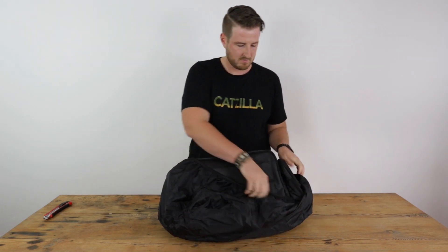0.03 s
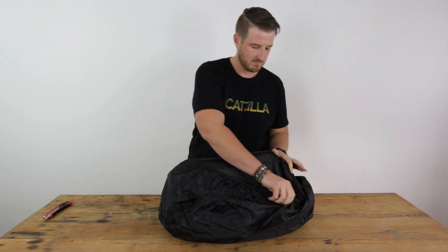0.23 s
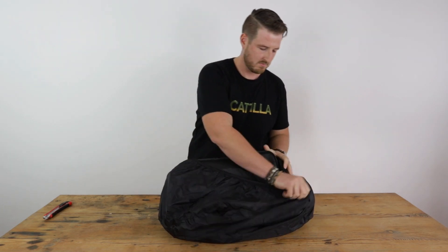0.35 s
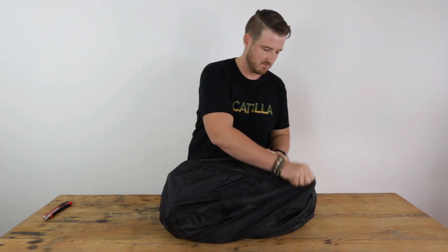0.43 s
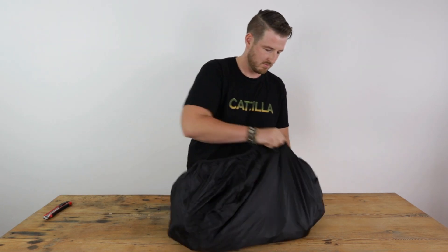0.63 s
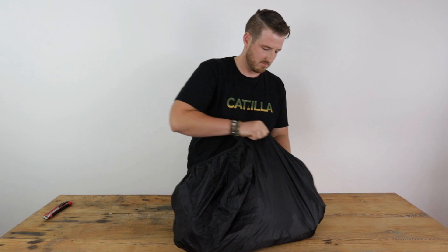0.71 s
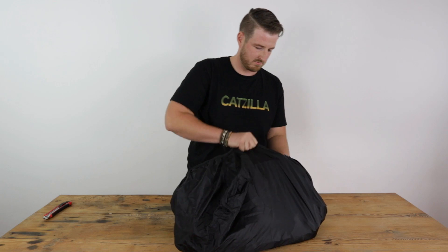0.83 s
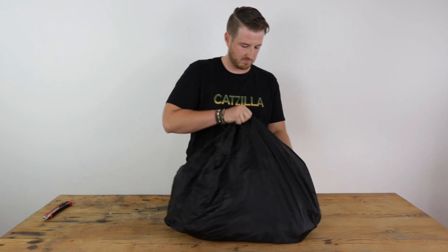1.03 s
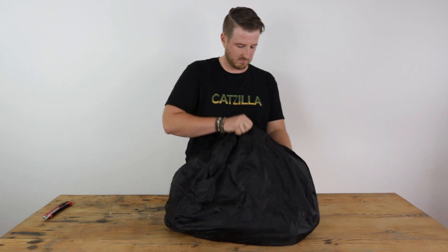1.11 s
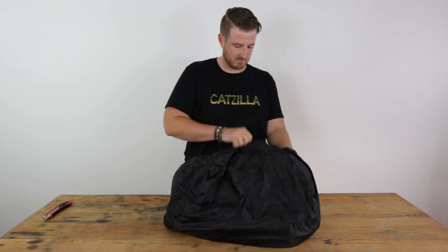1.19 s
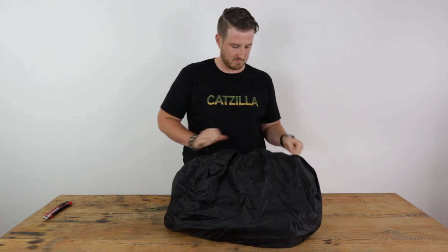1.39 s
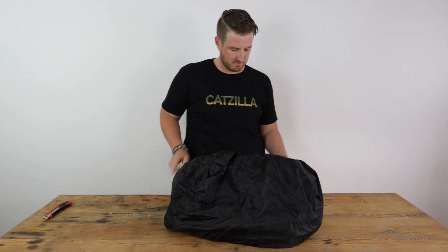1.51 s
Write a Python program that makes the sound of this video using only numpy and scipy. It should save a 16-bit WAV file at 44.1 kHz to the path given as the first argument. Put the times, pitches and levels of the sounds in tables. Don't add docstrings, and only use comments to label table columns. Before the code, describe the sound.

Waterproof fabric cover rustling over a bag, close and mono in a small bare room. Soft crinkles and sharp little crease ticks until 0.5 s, then a swelling bright swish from 0.6 s, peaking with a hollow, drum-like pop at 0.73 s. A brief dip, a second strong swish around 1.0 s, lighter rustling to 1.2 s, then fading, with a tiny metallic tick at 1.5 s.

```python
import sys
import numpy as np
from scipy import signal
from scipy.fft import rfft, irfft, next_fast_len
from scipy.io import wavfile

SR = 44100
rng = np.random.default_rng(int(sys.argv[2]) if len(sys.argv) > 2 else 0)


def makeup_ratio(level_db):
    decades = np.asarray(level_db, float) / 20
    return 10 ** decades


def unload_audio(sound):
    columns = np.transpose(np.atleast_2d(sound))
    steps = np.round(np.clip(columns, -1, 1) * 32767)
    wavfile.write(sys.argv[1], SR, steps.astype(np.int16))


N = 68355

POP_S = 0.7252


def rms_one(x):
    return x / np.sqrt(np.mean(x ** 2) + 1e-20)


def in_time(rows):
    time_s, *columns = np.transpose(rows)
    return [np.interp(np.arange(N) / SR, time_s, column) for column in columns]


def drift(rate_hz):
    hop = 40
    pole = np.exp(-2 * np.pi * rate_hz * hop / SR)
    noise = rng.standard_normal(N // hop + 2002)
    slow = signal.lfilter([1], [1, -2 * pole, pole * pole], noise)[2000:]
    return np.interp(np.arange(N) / hop, np.arange(len(slow)), rms_one(slow))


def ring(clicks, hz, t60_s):
    decay = makeup_ratio(-60 / (t60_s * SR))
    turn = 2 * np.pi * hz / SR
    feedback = [1, -2 * decay * np.cos(turn), decay * decay]
    return signal.lfilter([0, np.sin(turn)], feedback, clicks + 1e-18)


def click(start_s, size):
    return size * (np.arange(N) == int(start_s * SR))


def grains(per_s, spread_db, clump_db):
    sizes = makeup_ratio(spread_db * np.minimum(rng.exponential(1, N), 5)) * rng.choice([-1, 1], N)
    rate = per_s * makeup_ratio(clump_db * drift(25))
    return rms_one(sizes * (rng.random(N) < rate / SR))


def coloured(sources, spectrum, patchy_db, tilt_db=0):
    hz_at, db_at = np.transpose(spectrum)
    out = 0
    together = drift(8)
    edges_hz = 45 * 2 ** np.arange(0, 8.8, 0.5)
    for k, (low, high) in enumerate(zip(edges_hz, edges_hz[1:])):
        centre_hz = np.sqrt(low * high)
        band_pass = signal.butter(2, [low, high], "band", fs=SR, output="sos")
        band = signal.sosfilt(band_pass, sources[k % 2])
        level_db = np.interp(np.log(centre_hz), np.log(hz_at), db_at)
        level_db = level_db + tilt_db * np.log2(centre_hz / 6000)
        flicker_db = patchy_db * (0.6 * together + drift(14.6))
        out = out + makeup_ratio(level_db + flicker_db) * band
    return out


def swish():
    # time_s, level_db, brightness_db_per_octave
    slide = [(0.0, -36, -3), (0.18, -32, -0.2), (0.202, -28.5, 0.2), (0.288, -35, -1.3), (0.362, -24, 3.2),
             (0.378, -31, -0.2), (0.482, -31, -1.5), (0.638, -20, 1.5), (0.708, -19, -0.1),
             (0.728, -14.5, 0.5), (0.738, -27, 5.3), (0.828, -25.5, 0.1), (0.91, -32, 0.1),
             (0.984, -16, -0.1), (1.104, -24.5, 0), (1.156, -23, 2.2), (1.55, -48, -3.1)]
    # frequency_hz, density_db_per_hz
    weave_colour = [(880, -26), (1500, 16.5), (1840, -9.5), (2130, 4), (2650, -1.5), (3840, -1.5),
                    (6850, -1), (8260, -3), (15600, -12.5)]
    level_db, tilt_db = in_time(slide)
    rubs = [grains(per_s=15000, spread_db=2, clump_db=1.65) for _ in range(2)]
    gain = 1 / np.std(coloured(rubs, weave_colour, patchy_db=0))
    return makeup_ratio(level_db - 0.02) * gain * coloured(rubs, weave_colour, patchy_db=0.78, tilt_db=tilt_db)


def crinkles():
    # time_s, level_db
    crumple = [(0.0, -35.5), (0.31, -37.5), (0.44, -29.5), (0.574, -27), (0.638, -25), (0.988, -27.5),
               (1.126, -25), (1.394, -40), (1.55, -51)]
    # frequency_hz, density_db_per_hz
    fold_colour = [(35, -60), (60, -23), (297, -1), (340, -10.5), (550, -3), (1260, -5.5), (1360, -14),
                   (1590, -9), (6000, -16.5), (7800, -26), (13200, -120)]
    level_db, = in_time(crumple)
    snaps = [grains(per_s=3000, spread_db=3.5, clump_db=2.5) for _ in range(2)]
    return makeup_ratio(level_db + 1) * rms_one(coloured(snaps, fold_colour, patchy_db=2.0))


def creases():
    # start_s, peak_db, pitch_hz
    folds = [(0.019, -13, 977), (0.046, -12, 1830), (0.089, -6, 2650), (0.141, -16, 1270),
             (0.242, -10.5, 950), (0.362, -4.5, 1560), (0.402, -10, 1570), (0.436, -11.5, 830),
             (0.453, -12, 732), (0.466, -5.5, 1600), (0.58, -7.5, 2120), (0.642, -10, 1800),
             (0.981, -3.5, 2410), (1.033, -18, 1790), (1.468, -25, 2200)]
    cycles = 6.6
    out = np.zeros(N)
    for start_s, peak_db, pitch_hz in folds:
        kick = click(start_s + 0.001003, -makeup_ratio(peak_db - 4.5))
        t60_s = cycles / pitch_hz
        out += ring(kick, pitch_hz, t60_s)
        out += 0.49 * ring(kick, 1.62 * pitch_hz, t60_s / 1.3)
        out += makeup_ratio(-26) * ring(kick, 5000, 0.0015)
    return out


def flaps():
    # start_s, peak_db, pitch_hz
    panels = [(0.087, -23.5, 202), (0.158, -36, 202), (0.213, -30, 267), (0.358, -21, 350),
              (0.437, -29, 191), (0.448, -21.5, 212), (0.575, -25, 315), (0.684, -21, 231),
              (0.722, -5, 299), (0.781, -16, 291), (0.858, -43, 293), (0.941, -26, 371), (1.019, -34, 242),
              (1.074, -30, 237), (1.158, -20, 385), (1.274, -28, 213)]
    cycles = 8.4
    puffs = np.zeros(N)
    for start_s, peak_db, pitch_hz in panels:
        if abs(start_s - POP_S) > 0.01:
            puffs += ring(click(start_s + 0.0031, makeup_ratio(peak_db - 1.5)), pitch_hz, cycles / pitch_hz)
    return signal.sosfilt(signal.butter(2, 600, fs=SR, output="sos"), puffs)


def pop():
    # frequency_hz, level_db, t60_s
    membrane = [
        (295, 3, 0.053),
        (531, 3.5, .035),
        (780, -4.5, 0.013),
        (150, -28, 0.037),
    ]
    crack_db, crack_t60_s = -4.5, 0.008
    soft_blow = signal.butter(2, 1500, fs=SR, output="sos")
    kick = signal.sosfilt(soft_blow, click(POP_S, -makeup_ratio(-8.5)))
    since_s = np.arange(N) / SR - POP_S
    decay = (since_s > 0) * makeup_ratio(crack_db - 60 * np.abs(since_s) / crack_t60_s)
    crack_band = signal.butter(1, [1500, 10000], "band", fs=SR, output="sos")
    crack = signal.sosfilt(crack_band, rng.standard_normal(N) * decay)
    return crack + sum(makeup_ratio(db) * ring(kick, hz, t60_s) for hz, db, t60_s in membrane)


def toggle():
    # start_s, peak_db
    ticks = [
        (1.428, -40),
        (1.5065, -42),
        (1.512, -32.5),
    ]
    # frequency_hz, level_db, t60_s
    metal = [
        (7600, -5, .03),
        (7940, 3.5, .02),
        (13000, -12, .02),
    ]
    kicks = sum(click(start_s, makeup_ratio(peak_db)) for start_s, peak_db in ticks)
    return sum(makeup_ratio(db) * ring(kicks, hz, t60_s) for hz, db, t60_s in metal)


def room(x):
    t60_s, wall_cut_hz = 0.29, 5100
    size = next_fast_len(N + SR)
    w = 2 * np.pi * np.arange(size // 2 + 1) / size
    dull = 1 / (1 + 1j * w * SR / (2 * np.pi * wall_cut_hz))
    response = 0
    for k, lag in enumerate(rng.uniform(0.012, 0.04, 10) * SR):
        loss = makeup_ratio(-60 * lag / SR / t60_s)
        loop = loss * dull * np.exp(-1j * w * lag)
        response = response + (-1) ** k * loop / (1 - loop)
    return irfft(rfft(x, size) * response, size)[:N]


def background():
    return makeup_ratio(-71.5) * rms_one(signal.lfilter([1], [1, -0.99], rng.standard_normal(N)))


def scene():
    cover = swish() + crinkles() + creases() + flaps() + pop() + toggle()
    heard = cover + makeup_ratio(-17) * room(cover) + background()
    return np.tile(heard, (2, 1))


def roll_off(x):
    return signal.sosfilt(signal.butter(12, 15760, fs=SR, output="sos"), x)


def record(dry):
    return roll_off(np.clip(dry, -0.98, 0.98))


dry = scene()
out = record(dry)
unload_audio(out)
```